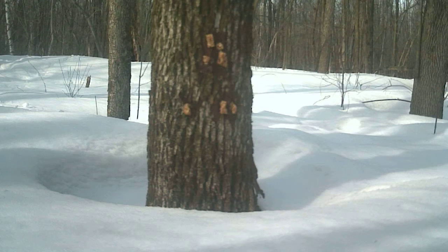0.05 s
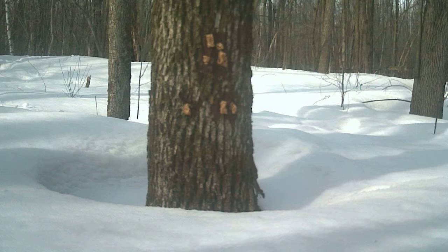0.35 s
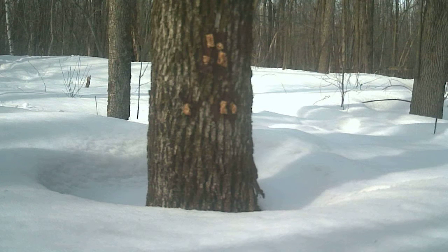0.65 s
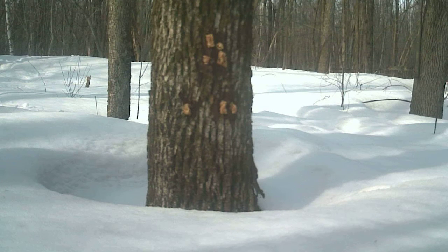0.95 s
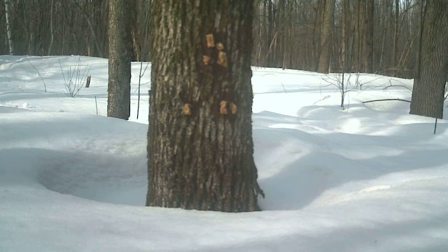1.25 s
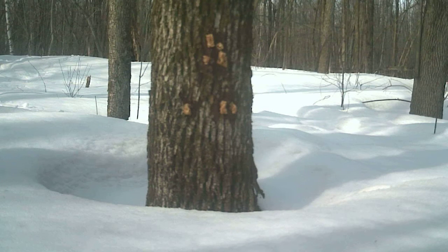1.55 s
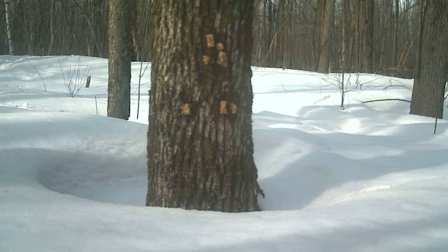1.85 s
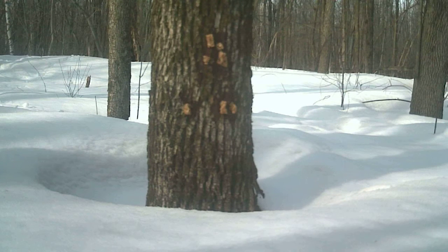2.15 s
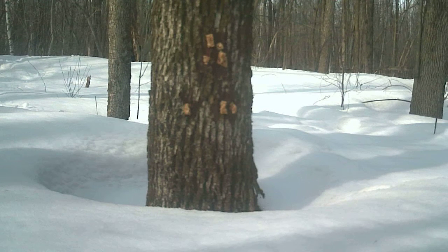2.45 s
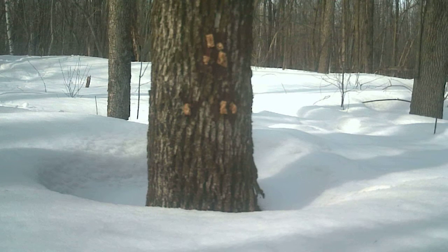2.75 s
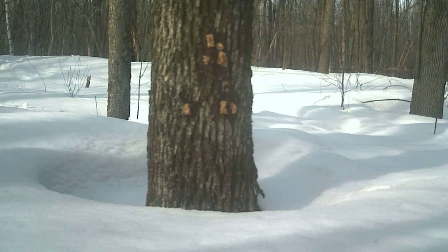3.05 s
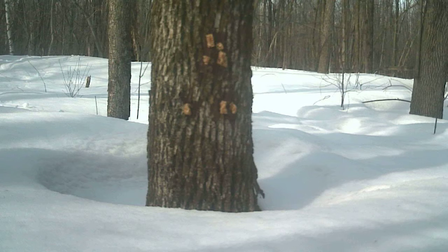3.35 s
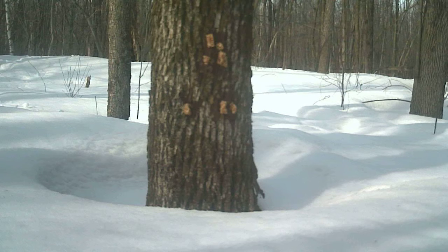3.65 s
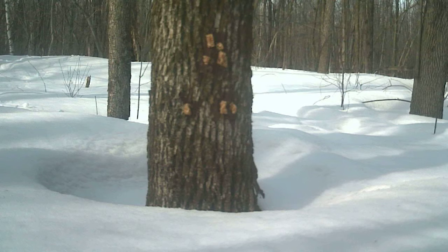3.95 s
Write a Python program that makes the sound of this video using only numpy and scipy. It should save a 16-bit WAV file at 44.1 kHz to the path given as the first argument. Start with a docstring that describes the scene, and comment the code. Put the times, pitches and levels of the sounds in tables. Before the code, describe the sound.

A soft, steady roar of far-off traffic hangs over a low rumble in a still, snowy wood. Faint drones and a low hum sit within it, fading by 3.4 seconds. Around 2.9 seconds the bass swells gently, and a very distant, wavering horn-like chord rises, peaking near 3.2 seconds and dying away around 4. Faint microphone hiss, a slight flickering rustle and a thin electrical whine continue throughout.

```python
"""A soft far-off roar, probably traffic, fills a still, snowy wood above a low rumble.
Faint drones and a low hum hang in the roar; near the end they die away as the bass swells gently and
a very distant horn-like chord rises, its tones wavering and blurred by scattering among the trees.
A slight rustle flickers in the microphone's own hiss. The recorder adds a thin electrical whine,
cuts the top of the treble and rests on a constant offset."""
import sys
import numpy as np
from scipy import signal
from scipy.fft import rfft, irfft
from scipy.io import wavfile

SR = 44100
rng = np.random.default_rng(int(sys.argv[2]) if len(sys.argv) > 2 else 0)


def transcribe(signal):
    """Save signal, clipped to [-1, 1], as a 16-bit WAV file at the path in sys.argv[1]."""
    frames = np.atleast_2d(signal).T
    limited = np.clip(frames, -1, 1)
    pcm = np.round(limited * 32767).astype(np.int16)
    wavfile.write(sys.argv[1], SR, pcm)


N = 176400
TIME = np.arange(N) / SR


# Spectrum of the roar: (frequency [Hz], density [dB/Hz])
ROAR_SPECTRUM = [(60, -90.5), (150, -86.5), (270, -86), (420, -84.5), (580, -85.5), (800, -85.5),
                 (950, -85.5), (1100, -91.5), (1450, -98), (2000, -104), (4000, -120)]
# Slow envelope of the roar: (time [s], gain [dB])
ROAR_ENVELOPE = [(0, 0.5), (1.2, 0.45), (2.3, 0.33), (3.2, 0.76), (4, .6)]

def distant_roar():
    """Broadband noise from beyond the wood: its spectrum falls away above 1 kHz, its level barely moves."""
    gain_db = np.interp(TIME, *np.transpose(ROAR_ENVELOPE))
    return from_db(gain_db) * shaped_noise(ROAR_SPECTRUM, flutter_db=.5)


# Spectrum of the rumble: (frequency [Hz], density [dB/Hz])
RUMBLE_SPECTRUM = [(12, -78.5), (24, -73), (36, -77), (52, -82.5), (80, -79.5), (120, -84.5), (200, -95),
                   (400, -115)]
# Spectrum of the bass swell at its peak: (frequency [Hz], density [dB/Hz])
SWELL_SPECTRUM = [(50, -105), (100, -86.5), (155, -82), (230, -86), (330, -86), (450, -100), (900, -125)]

def rumble():
    """Incoherent noises add in power: one gentle swell rises over a continuous bass."""
    swell = bell(at_s=2.905, width_s=.31) * shaped_noise(SWELL_SPECTRUM, flutter_db=-1.4)
    return swell + shaped_noise(RUMBLE_SPECTRUM, flutter_db=-1.4)


# Notes of the horn: (frequency [Hz], rms level at the crest [dB], start [s], attack [s])
HORN_CHORD = [(316.9, -61, 2.83, 0.52), (434, -71, 3.0, .2), (472.4, -55.5, 3.08, .1),
              (563, -72.5, 2.7, 0.38), (645, -76, 3.5, 0.23)]

def horn():
    """Superposed tones form a chord; each creeps in faintly, swells and decays exponentially."""
    lead_s, lead_db, decay_db_per_s = .54, -9.5, 6.5
    release_at_s, release_db_per_s = 3.85, 36
    chord = 0
    for hz, db, start, attack in HORN_CHORD:
        age = TIME - start
        lead = from_db(lead_db) * np.clip(1 + age / lead_s, 0, 1)
        swell = np.clip(age / attack, 0, 1)
        decay = from_db(-decay_db_per_s * np.maximum(age - attack, 0))
        chord += np.maximum(lead, swell) * decay * far_tone(hz, db, scatter=.12)
    return chord * from_db(-release_db_per_s * np.maximum(TIME - release_at_s, 0))


# Far drones before they fade: (frequency [Hz], rms level [dB])
DRONE_TONES = [(361, -71), (478, -69.5)]

def drones():
    """Partial masking: blurred tones and a low hum barely stand out of the roar, then die away."""
    end_s, fade_s = 3.42, .3
    fade = np.clip((end_s - TIME) / fade_s, 0, 1)
    low_hum = far_tone(hz=84, db=-67.5, scatter=1.2)
    tones = sum(far_tone(hz, db, scatter=.7) for hz, db in DRONE_TONES)
    return fade * (low_hum + tones)


# Spectrum of the hiss: (frequency [Hz], density [dB/Hz])
HISS_SPECTRUM = [(300, -104), (1500, -102), (2300, -102), (3300, -103.6), (4000, -104.5), (5500, -105.1),
                 (7350, -105.9), (8000, -110.6), (8500, -121)]
# Brief lifts of the hiss: (time [s], width [s], rise [dB])
HISS_RISES = [(.71, .04, 0.2), (2.44, 0.028, 1)]

def microphone_hiss():
    """Self-noise of the microphone: a nearly steady floor that lifts slightly twice."""
    return lift_gain(HISS_RISES) * shaped_noise(HISS_SPECTRUM, flutter_db=.2)


# Spectrum of the rustle: (frequency [Hz], density [dB/Hz])
RUSTLE_SPECTRUM = [(700, -112), (1500, -103), (2250, -104), (2650, -101.8), (2880, -98.5), (3350, -106),
                   (4000, -113), (7000, -122), (8500, -140)]
# Soft stirs in the rustle: (time [s], width [s], rise [dB])
RUSTLE_STIRS = [(1.44, .015, 1), (2.39, .02, 5)]

def rustle():
    """Fast random amplitude modulation makes faint upper-midrange noise flicker."""
    return lift_gain(RUSTLE_STIRS) * shaped_noise(RUSTLE_SPECTRUM, flutter_db=2.3, flutter_per_s=36)


def recorder_whine(hz=3671, rms_db=-87):
    """A pure tone of electrical origin, heard as a thin whine."""
    return from_db(rms_db) * np.sqrt(2) * np.sin(2 * np.pi * hz * TIME)


def far_tone(hz, db, scatter):
    """Multipath scattering by trees blurs a wavering tone; scatter is the scattered-to-direct rms ratio."""
    wander_hz, waver_db, waver_per_s = .7, .5, 3
    phase = 2 * np.pi * np.cumsum(hz + wander_hz * drift(waver_per_s)) / SR
    direct = np.sqrt(2) * np.sin(phase)
    scattered = drift(10) * np.sin(phase) + drift(9.3) * np.cos(phase)
    tone = (direct + scatter * scattered) / np.sqrt(1 + scatter ** 2)
    return tone * from_db(db + waver_db * drift(waver_per_s))


def shaped_noise(spectrum, flutter_db, flutter_per_s=6):
    """Spectral shaping gives white noise the stated density; its level then flutters at random."""
    points_hz, db = np.transpose(spectrum)
    hz = np.maximum(np.arange(N // 2 + 1) * SR / N, 1)
    gain = from_db(np.interp(np.log(hz), np.log(points_hz), db)) * np.sqrt(SR / 2)
    steady = irfft(rfft(rng.standard_normal(N)) * gain, N)
    return steady * from_db(flutter_db * drift(flutter_per_s))


def drift(rate):
    """Low-pass noise of unit variance, changing about rate times a second."""
    hz = np.arange(N + 1) * SR / (2 * N)
    slow = irfft(rfft(rng.standard_normal(2 * N)) / (1 + (hz / rate) ** 2) ** 2)[:N]
    return (slow - slow.mean()) / slow.std()


def lift_gain(lifts):
    """Gains multiply as decibels add: one bell-shaped rise for each row."""
    return from_db(sum(db * bell(at_s, width_s) for at_s, width_s, db in lifts))


def bell(at_s, width_s):
    """Gaussian envelope with a peak of 1."""
    return np.exp(-.5 * ((TIME - at_s) / width_s) ** 2)


def from_db(db):
    """Amplitude ratio of a level in decibels."""
    return 10 ** (np.asarray(db) / 20)


def scene():
    """Linear superposition of all sources in one channel."""
    far_sounds = distant_roar() + rumble() + horn() + drones()
    return (far_sounds + microphone_hiss() + rustle() + recorder_whine())[None]


def record(dry):
    """Band limiting and DC bias: the recorder cuts the top steeply and rests off centre."""
    stopband_hz, stopband_db, dc_offset = 9050, 60, -.1411
    lowpass = signal.cheby2(16, stopband_db, stopband_hz, fs=SR, output="sos")
    return signal.sosfilt(lowpass, dry) + dc_offset


dry = scene()
out = record(dry)
transcribe(out)
```